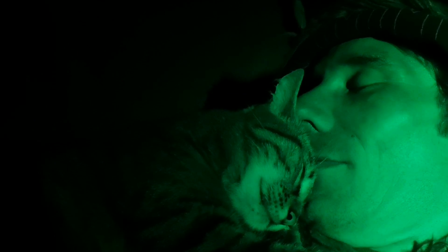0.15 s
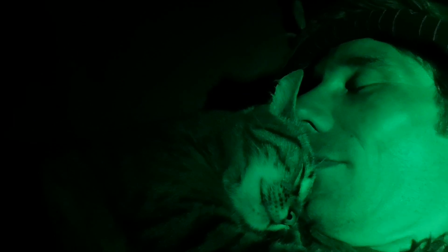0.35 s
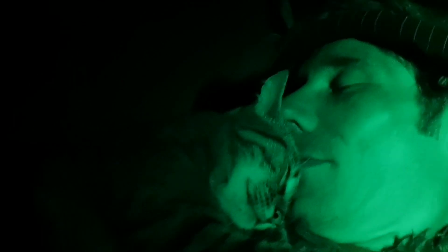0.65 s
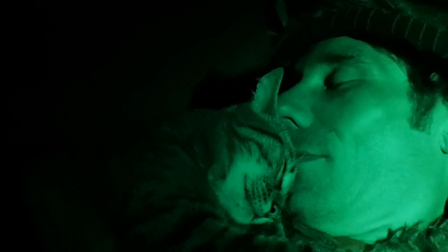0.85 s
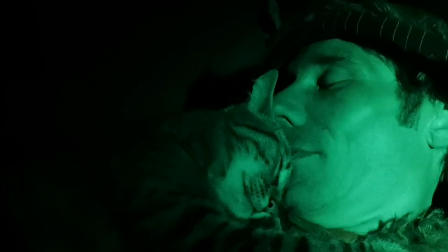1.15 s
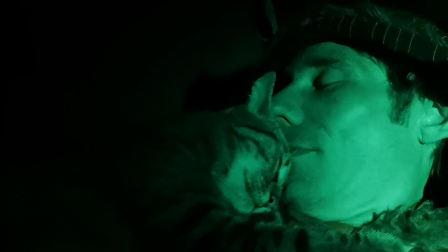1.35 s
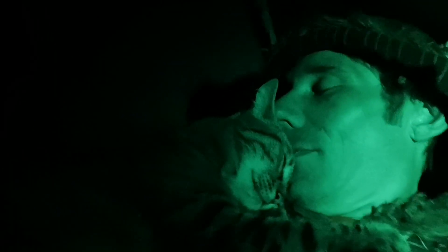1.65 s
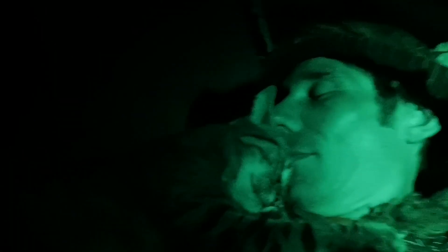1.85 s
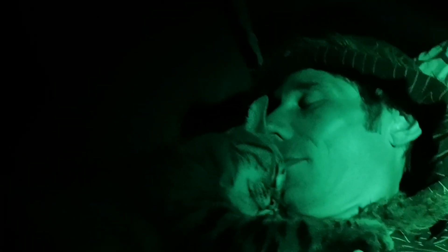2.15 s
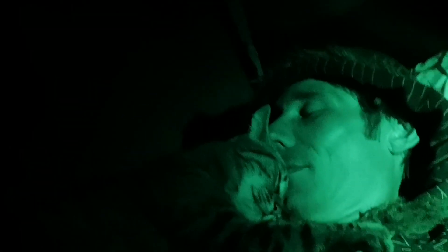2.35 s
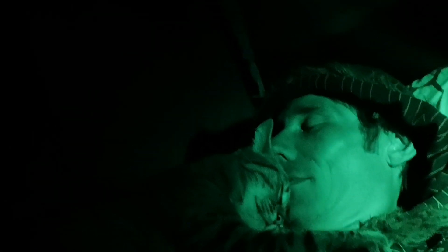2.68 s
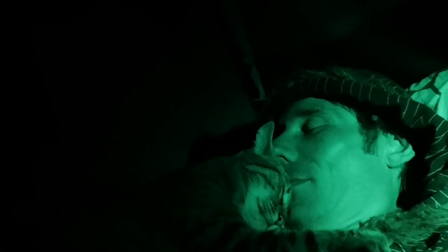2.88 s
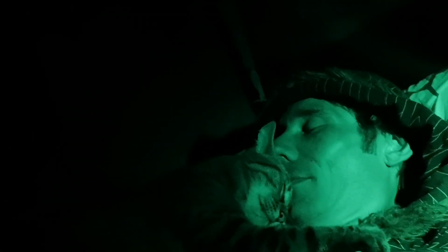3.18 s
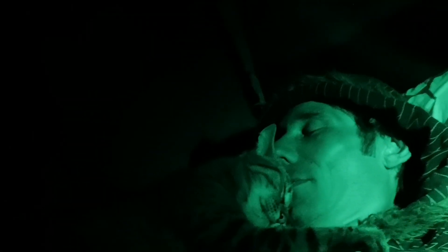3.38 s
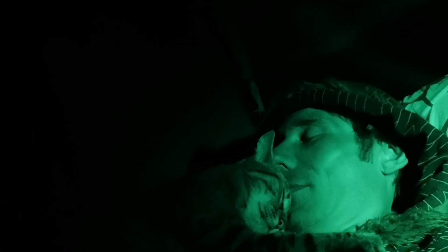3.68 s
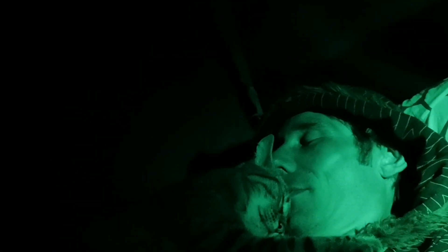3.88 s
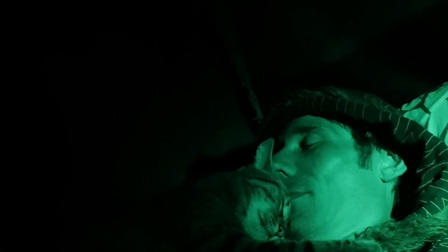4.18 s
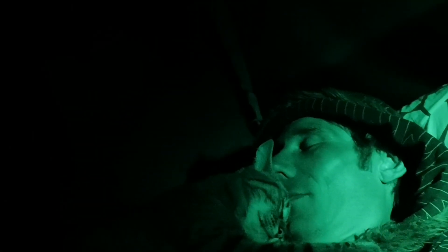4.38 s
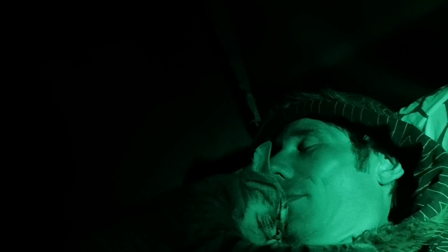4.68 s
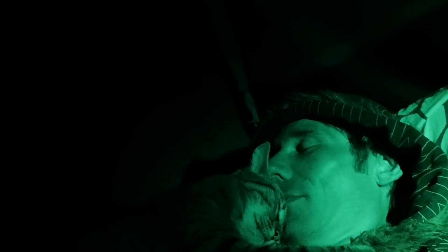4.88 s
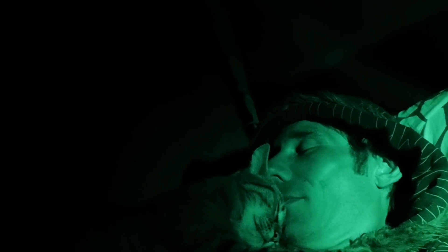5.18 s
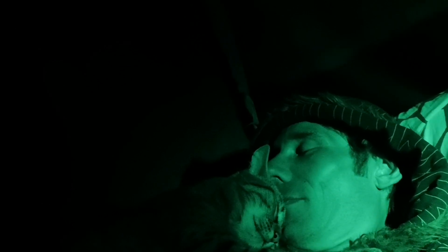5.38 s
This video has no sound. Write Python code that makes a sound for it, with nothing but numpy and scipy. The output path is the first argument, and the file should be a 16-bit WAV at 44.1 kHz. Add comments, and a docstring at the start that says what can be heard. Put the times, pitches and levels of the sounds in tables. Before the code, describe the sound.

A cat's close rustling and soft bumps on the microphone give way to small sharp clicks that slow down over low room rumble.

```python
"""A quiet bedroom where a cat dozes unheard against a pillow: low room rumble, electronic hiss, a thin whine.
From 0.8 s something rubs slowly on the microphone housing, beside the right port. The contact sticks
and slips, knocking soft thumps out of the housing, with a gritty rustle as it slides. Around 2.5 s it
nudges in four times. From 3 s the slips turn into sharp dry clicks that come ever further apart."""
import sys
import numpy as np
from scipy import signal
from scipy.fft import rfft, irfft, next_fast_len
from scipy.io import wavfile

SR = 44100
rng = np.random.default_rng(int(sys.argv[2]) if len(sys.argv) > 2 else 0)


def wav_out(sig):
    """Save sig, one row per channel (or a flat mono array), as 16-bit PCM at SR to the path in sys.argv[1]."""
    wavfile.write(sys.argv[1], SR, np.round(np.clip(np.atleast_2d(sig).T, -1, 1) * 32767).astype(np.int16))


N = 244225
TIME = np.arange(N) / SR
FFT_SIZE = next_fast_len(N, True)
FREQS = np.maximum(np.arange(FFT_SIZE // 2 + 1) * SR / FFT_SIZE, 1)

# Soft slips. Each row: time in seconds, thump in dB, release in ms, grit in dB.
SLIPS = [(0.7781, -23, 0.064, -35.5), (0.8, -28.5, 0.42, -44.5), (0.8316, -27, 0.44, -45),
         (0.9835, -27, 0.21, -41.5), (1.01, -28, 0.37, -42), (1.1584, -26.5, 0.19, -43),
         (1.1781, -30, 0.5, -43), (1.2468, -25.5, 0.15, -39.5), (1.3676, -26, 0.14, -40),
         (1.4113, -27, .12, -43.5), (1.428, -28, .39, -44), (1.4596, -29.5, 0.14, -38),
         (1.476, -31, .25, -41), (1.4935, -29.5, 0.23, -40), (1.5241, -28.5, 0.12, -44),
         (1.5377, -30.5, .17, -38.5), (1.5742, -28.5, .13, -41), (1.5904, -34.5, .11, -45),
         (1.6598, -27.5, 0.062, -40), (1.7141, -32, 0.14, -39), (1.7447, -33.5, 0.19, -40),
         (1.773, -44, 0.16, -32.5), (1.8128, -34.5, 0.48, -40), (1.8425, -31, 0.45, -42),
         (1.9119, -39, 0.26, -40.5), (1.954, -42, 0.49, -38), (2.0567, -44, 0.067, -43.5),
         (2.0779, -34, 0.58, -53), (2.1564, -36.5, 0.46, -49), (2.292, -31.5, 0.91, -43.5),
         (2.6304, -37, 0.032, -33), (2.7295, -25.5, 0.89, -38.5), (2.751, -27.5, 0.45, -43),
         (2.9097, -28.5, 0.93, -43.5), (2.9231, -56, 0.23, -38), (2.9896, -44.5, .12, -38),
         (3.0076, -22.5, 1, -40.5)]
# Tiny specks of sound; the one at 3.359 s is a faint hiss just ahead of the click at 3.364 s.
# Each row: time in seconds, strength in dB, grit length in ms.
SPECKS = [(1.799, -47, 2.2), (2.874, -55, 1.4), (3.359, -49.5, 1.7), (3.554, -59, 1.7), (3.931, -52, .8),
          (4.479, -54, .9), (4.526, -53.5, 3.2)]
# Nudges, where the contact presses in and lets go. Each row: time in seconds, thump in dB, grit in dB.
NUDGES = [(2.3819, -21, -27.5), (2.4291, -21.5, -32.5), (2.4609, -19.5, -32.5), (2.5979, -17, -30.5)]
# Sharp slips, each led by a weaker twitch. Each row: time in seconds, thump in dB, release in ms,
# twitch lead in ms, low chirp in Hz, its strength in dB, high chirp in Hz, its strength in dB.
CLICKS = [(3.0255, -28, 0.29, .55, 1700, -38, 6100, -19.5), (3.047, -22.5, 0.42, .33, 1980, -30, 6050, -20),
          (3.0637, -21, 0.34, 1.42, 1530, -26, 5800, -16),
          (3.081, -23, 0.23, 0.225, 1210, -48, 5930, -15.5),
          (3.1467, -24, 0.61, 0.503, 2930, -29, 5140, -25),
          (3.2174, -27, 0.39, .39, 1443, -32.5, 6000, -17.5),
          (3.3641, -23, 0.59, 0.31, 2030, -28, 5400, -19.5),
          (3.606, -20.5, 0.48, 0.66, 2740, -24.5, 5080, -14),
          (3.9134, -20, 0.74, 0.607, 3000, -24.5, 5840, -17.5),
          (4.2583, -21, 0.48, 0.44, 2340, -27.5, 5800, -9), (4.6405, -22, 0.45, 0.42, 2620, -31, 5990, -11),
          (5.36, -21, 0.34, 0.34, 1370, -46, 6250, -6.5)]


def from_db(db):
    """Decibels to gain."""
    return 10 ** (np.asarray(db) / 20)


def unit_rms(x):
    """Scale to an rms of 1."""
    return x / np.sqrt(np.mean(x ** 2) + 1e-20)


def over_hz(points):
    """Draw a curve through (Hz, value) points on a log-frequency axis."""
    hz, value = np.transpose(points)
    return np.interp(np.log(FREQS), np.log(hz), value)


def filtered(x, gain):
    """EQ with one gain per frequency."""
    return irfft(rfft(x, FFT_SIZE) * gain, FFT_SIZE)[..., :N]


def dulled(x, corner_hz, order=2):
    """Roll off the highs above the corner."""
    return filtered(x, 1 / (1 + (FREQS / corner_hz) ** order))


def drift(rate_hz):
    """A random wobble with an rms of 1, mostly slower than the given rate."""
    return unit_rms(dulled(rng.standard_normal(N), rate_hz))


def cusp(ms, rise_ms, fall_ms):
    """Exponential build-up to 1, then exponential decay."""
    return np.exp(np.where(ms < 0, ms / rise_ms, -ms / fall_ms))


def play(rows, shape):
    """Lay down one short shape per row; it gets the ms since its event and the other columns."""
    track, reach = np.zeros(N), SR // 25
    for at_s, *columns in rows:
        span = slice(max(int(at_s * SR) - reach, 0), int(at_s * SR) + reach)
        track[span] += shape((TIME[span] - at_s) * 1000, *columns)
    return track


def room_tone(bed_db=-62.5, swell_db=5.0, swell_hz=12, rumble_hz=170):
    """Room rumble that swells and sinks, shared by both ports, under hiss of their own."""
    # Tone of the room and electronics. Each row: frequency in Hz, relative level in dB.
    tone = [(12, -30), (20, 2), (87, -8.5), (153, -22.5), (196, -25), (232, -26), (324, -29), (427, -32.5),
            (478, -37), (2150, -34), (4680, -42.5), (6540, -44.5), (7110, -42.5), (8170, -49.5),
            (15500, -51)]
    # How alike the ports sound. Each row: frequency in Hz, left-right correlation.
    likeness = [(60, 1), (130, 0.73), (290, -0.38), (640, -0.69), (1410, 0.25), (3100, -0.16),
                (6820, -0.012), (15000, -0.01)]
    alike = np.clip(over_hz(likeness), -.99, .99)
    colour = from_db(over_hz(tone)) / np.sqrt(1 + np.maximum(alike, 0))
    mid = filtered(rng.standard_normal(N), colour * np.sqrt(1 + alike))
    side = filtered(rng.standard_normal(N), colour * np.sqrt(1 - alike))
    air = np.array([mid + side, mid - side]) * from_db(bed_db) / np.std(mid)
    rumble = signal.sosfiltfilt(signal.butter(2, rumble_hz, fs=SR, output="sos"), air)
    swell = unit_rms(from_db(swell_db * drift(swell_hz)))
    return air + rumble * (swell - 1)


def whine(waver_hz=4):
    """The electronics sing one thin, wavering note, panned to the right."""
    # The note. Each row: pitch in Hz, rms level in dB before panning.
    notes = [(6885, -91)]
    tone = np.zeros(N)
    for hz, db in notes:
        phase = 2 * np.pi * np.cumsum(hz + waver_hz * drift(30)) / SR
        tone += from_db(db) * np.sqrt(2) * np.sin(phase)
    return tone * from_db([[-3], [3]])


def jolt(ms, db, release_ms):
    """The force of a slip: the quicker the release, the taller and brighter the pulse."""
    return from_db(db) * cusp(ms, release_ms, release_ms) / (2 * release_ms)


def thumps(press_ms=1.95, soft_ms=0.62):
    """Force on the housing: slips pull once, nudges push and then pull; each speck adds a slight pulse."""
    def nudge(ms, db, grit_db):
        return (jolt(ms + press_ms / 2, db, soft_ms) - jolt(ms - press_ms / 2, db, soft_ms)) / 2
    pulls = play([row[:3] for row in SLIPS + CLICKS], jolt)
    specks = play(SPECKS, lambda ms, db, length_ms: jolt(ms, db, release_ms=.04) / length_ms)
    return play(NUDGES, nudge) - pulls - specks


def resonance(x, hz, width_hz, db):
    """A two-pole resonance with the given gain at its peak."""
    radius = np.exp(-np.pi * width_hz / SR)
    poles = [1, -2 * radius * np.cos(2 * np.pi * hz / SR), radius ** 2]
    return from_db(db) * (1 - radius ** 2) / 2 * signal.lfilter([1, 0, -1], poles, x + 1e-18)


def housing(force):
    """The force knocks the damped housing, which gives each thump its body."""
    # Its low sway and upper panel modes. Each row: pitch in Hz, width in Hz, gain in dB.
    modes = [(50.8, 23.4, -2.5), (109.1, 54, 0.5), (166, 155, -5.5), (485, 215, 0), (740, 210, -8),
             (1330, 113, -12.5)]
    return sum(resonance(force, *mode) for mode in modes)


def housing_ring(force):
    """One part of the housing rings on, struck more squarely once the contact has moved along."""
    # The ringing mode: pitch in Hz, width in Hz, gain in dB.
    mode = (234, 2.55, -7)
    # How squarely it is struck. Each row: time in seconds, drive in dB.
    drive = [(1.5, -4), (2.6, 0.5)]
    return resonance(force * from_db(np.interp(TIME, *np.transpose(drive))), *mode)


def spurts(rows):
    """A quick swell and a slower fade of grit for each time in seconds, level in dB and length in ms."""
    return play(rows, lambda ms, db, length_ms: from_db(db) * cusp(ms / length_ms, 0.31, 1.04))


def friction(slide, slip_ms=2.96, nudge_ms=1.33, uneven_db=3.5, grain_db=2.0, thinning=0.65):
    """Tiny catches of the surface: spurts at slips, a stream while sliding, a creep into each click."""
    # Colour of the grit. Each row: frequency in Hz, relative level in dB.
    colour = [(150, -31), (350, -2.5), (600, 3.5), (1100, 5), (2200, 8), (3500, 3.5), (5500, 2.5),
              (7500, 2.5), (10000, -10.5), (16000, -14)]
    slip_grit = [(at_s, db, slip_ms) for at_s, _, _, db in SLIPS]
    nudge_grit = [(at_s, db, nudge_ms) for at_s, _, db in NUDGES]
    grit = spurts(slip_grit + nudge_grit + SPECKS)
    # The creep peaks 23 dB under the strength of the click's high chirp.
    creep = play(CLICKS, lambda ms, *row: from_db(row[-1] - 23) * cusp(ms, rise_ms=1.8, fall_ms=0.71))
    stream = slide * from_db(1 + uneven_db * drift(107))
    grains = rng.standard_normal(N) * from_db(grain_db * drift(4600))
    catches = unit_rms(filtered(grains, from_db(over_hz(colour))))
    body = dulled(catches, corner_hz=2000, order=4)
    catches -= thinning * slide / slide.max() * body   # fast sliding sounds thinner
    return catches * np.sqrt(stream ** 2 + grit ** 2 + creep ** 2)


def sliding(attack_ms=2.5, release_ms=8):
    """Envelope of the sliding: short rubs bite, hold and die away; one long slide swells and fades."""
    # Short rubs. Each row: start in seconds, length in seconds, strength in dB.
    rubs = [(1.164, .022, -66), (1.411, 0.017, -49.5), (1.461, 0.035, -54), (1.525, 0.015, -48.5),
            (1.576, 0.0087, -51.5), (1.928, 0.059, -51), (2.055, 0.036, -56), (2.119, 0.081, -57.5),
            (2.379, 0.0093, -47.5), (2.431, .03, -61), (2.598, 0.047, -50.5), (2.722, 0.044, -61.5),
            (2.917, 0.011, -50), (2.982, 0.064, -61)]
    # The long slide. Each row: time in seconds, relative strength in dB.
    long_slide = [(1.6, -83), (1.624, -57.5), (1.652, -59.5), (1.662, -51), (1.698, -51.5), (1.782, -47),
                  (1.79, -61.5), (1.84, -56.5), (1.9, -83)]
    strength = from_db(np.interp(TIME, *np.transpose(long_slide), left=-120, right=-120) + 3.5)
    for start_s, length_s, db in rubs:
        outside_ms = (TIME - np.clip(TIME, start_s, start_s + length_s)) * 1000
        strength += from_db(db) * cusp(np.clip(outside_ms, -200, 200), attack_ms, release_ms)
    return strength


def drag(slide, gain_db=0.5):
    """Sliding shakes the housing with a low, uneven force."""
    return from_db(gain_db) * slide * drift(rate_hz=160)


def snags(slide, per_s=60, gain_db=11, spread_db=3, release_hz=900):
    """The sliding contact snags now and then and gives the housing a small quick pull."""
    caught = rng.random(N) < per_s / SR
    sizes = from_db(gain_db + spread_db * np.clip(rng.standard_normal(N), -2, 2))
    return -dulled(caught * sizes * slide, release_hz) * SR / (np.pi * release_hz)


def sparkle(slide, lowest_hz=7500, fade_hz=12000, slide_db=-59, nudge_db=-50, nudge_ms=3.4, uneven_db=4):
    """Very fine catches add an airy top to the hardest sliding and to each nudge."""
    low_cut = signal.butter(2, lowest_hz, "high", fs=SR, output="sos")
    fine = dulled(signal.sosfilt(low_cut, rng.standard_normal(N)), fade_hz)
    hard_sliding = from_db(slide_db + uneven_db * drift(90)) * (slide / slide.max()) ** 2
    return fine * (hard_sliding + spurts([(row[0], nudge_db, nudge_ms) for row in NUDGES]))


def chirp(ms, hz, db, rise_cycles=0.88, fall_cycles=0.24):
    """The contact chatters ever harder, then breaks free within a cycle."""
    cycles = ms * hz / 1000
    return from_db(db) * cusp(cycles, rise_cycles, fall_cycles) * np.cos(2 * np.pi * cycles)


def clicks(gain_db=0.3, lowest_hz=700, twitch_share=0.4):
    """A twitch and a snap chatter at the same two pitches; their gap hollows each click its own way."""
    def click(ms, thump_db, release_ms, lead_ms, low_hz, low_db, high_hz, high_db):
        twitch, snap = (chirp(t, low_hz, low_db) + chirp(t, high_hz, high_db) for t in (ms + lead_ms, ms))
        return twitch_share * twitch + snap
    return from_db(gain_db) * filtered(play(CLICKS, click), 1 / (1 + (lowest_hz / FREQS) ** 4))


def near_port(rustle, snaps, top_hz=8280, leak_db=-16.5):
    """The port passes little of the top octave; some rustle leaks by unfiltered."""
    high_cut = signal.butter(14, top_hz, fs=SR, output="sos")
    return signal.sosfilt(high_cut, rustle + snaps + 1e-18) + from_db(leak_db) * rustle


def far_port(near, lag_ms=0.61):
    """The far port hears the contact later and duller."""
    # Its tone against the near port. Each row: frequency in Hz, gain in dB.
    shading = [(30, 5), (60, 1), (110, -4), (200, -4), (400, -6.5), (600, -9), (1100, -11.5), (2400, -23),
               (4400, -21), (8000, -26.5), (15000, -1)]
    shaded = filtered(near, from_db(over_hz(shading)))
    return np.interp(TIME - lag_ms / 1000, TIME, shaded)


def scene():
    """The contact plays close on the right and the ring sits in the centre, over room tone and whine."""
    slide = sliding()
    force = thumps() + drag(slide) + snags(slide)
    right = housing(force) + near_port(friction(slide), clicks()) + sparkle(slide)
    return np.array([far_port(right), right]) + housing_ring(force) + room_tone() + whine()


def record(dry):
    """A steep high cut at 15.7 kHz across the mix."""
    return signal.sosfilt(signal.ellip(10, .2, 70, 15700, fs=SR, output="sos"), dry)


dry = scene()
out = record(dry)
wav_out(out)
```